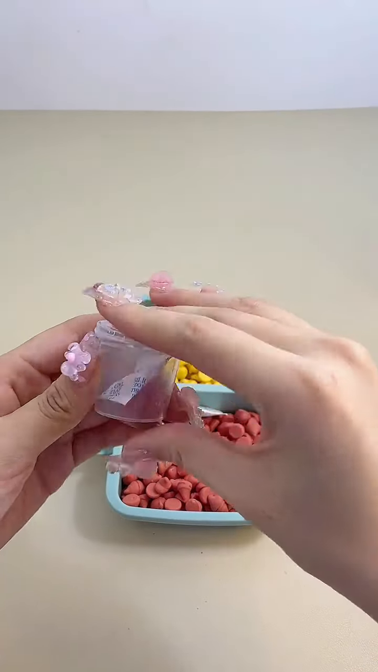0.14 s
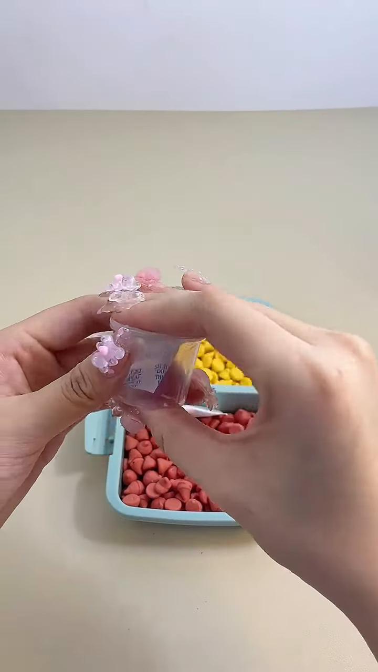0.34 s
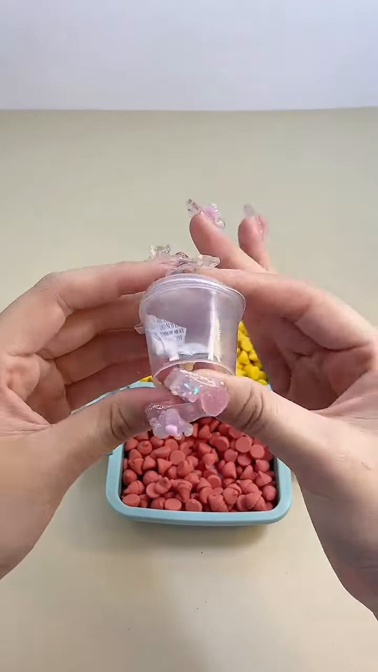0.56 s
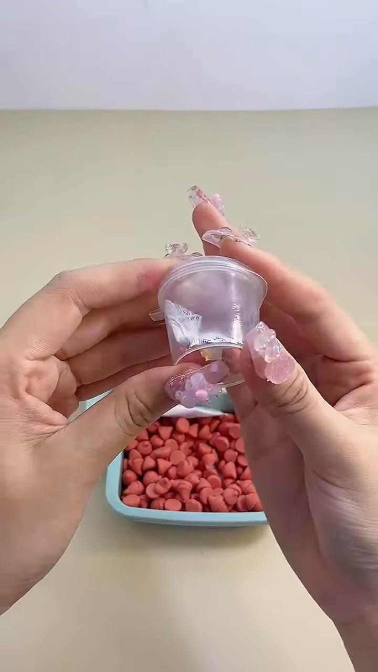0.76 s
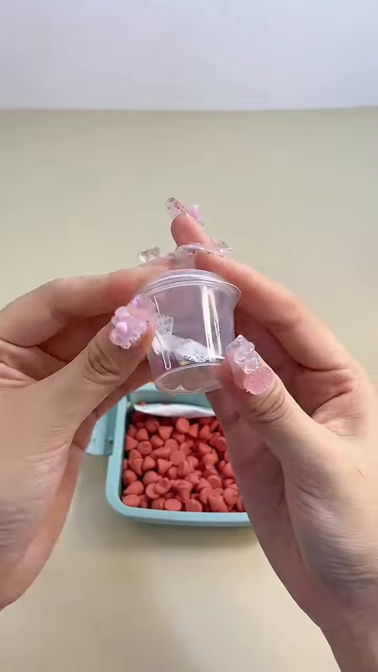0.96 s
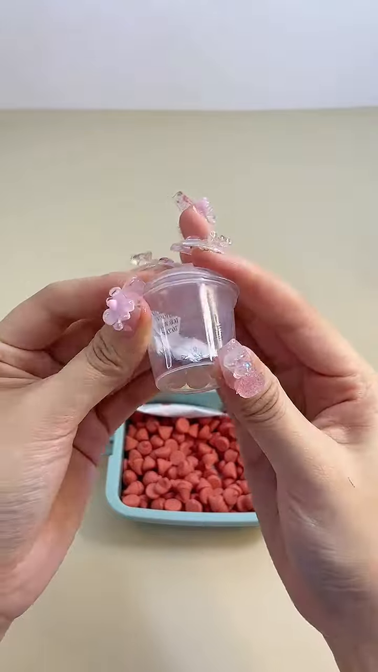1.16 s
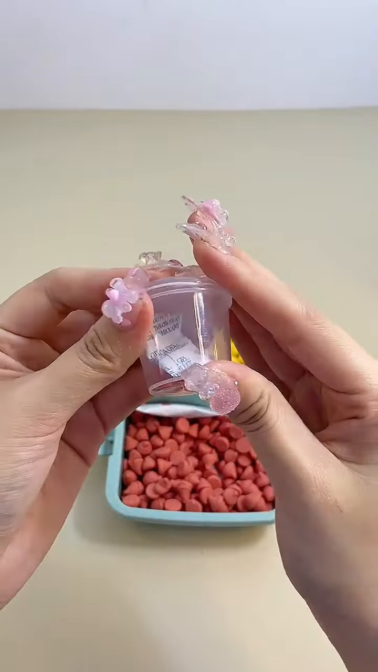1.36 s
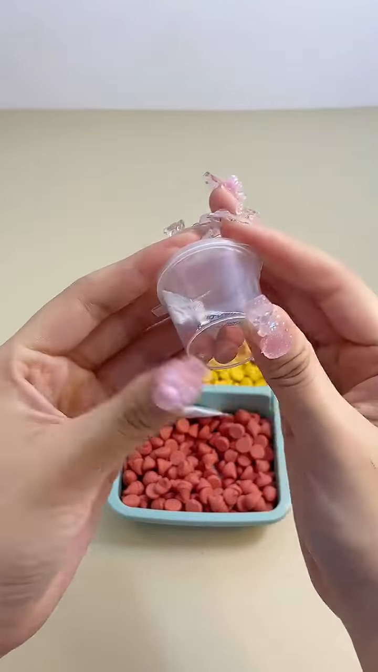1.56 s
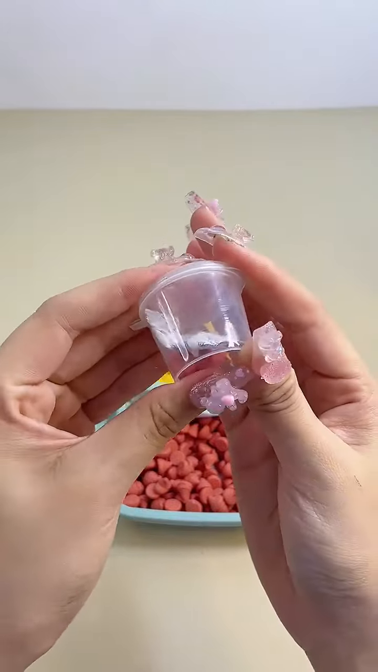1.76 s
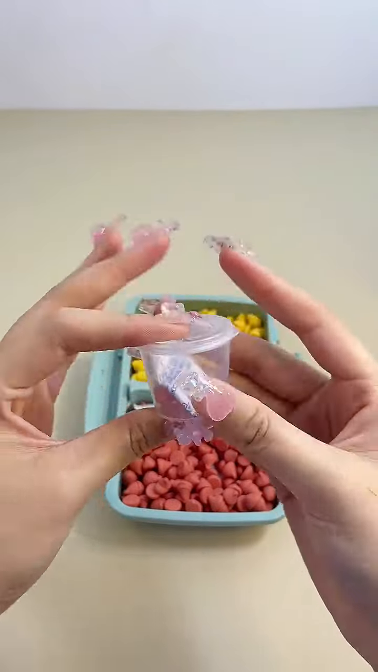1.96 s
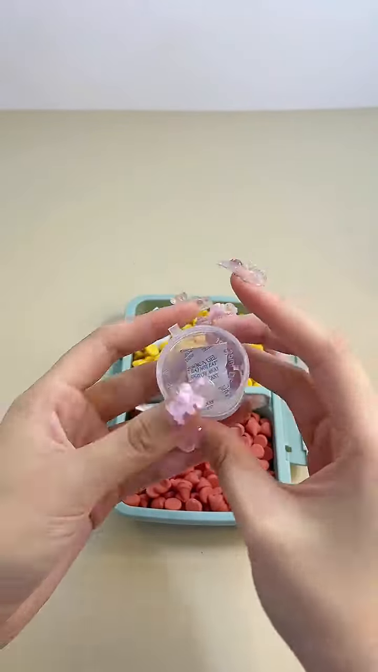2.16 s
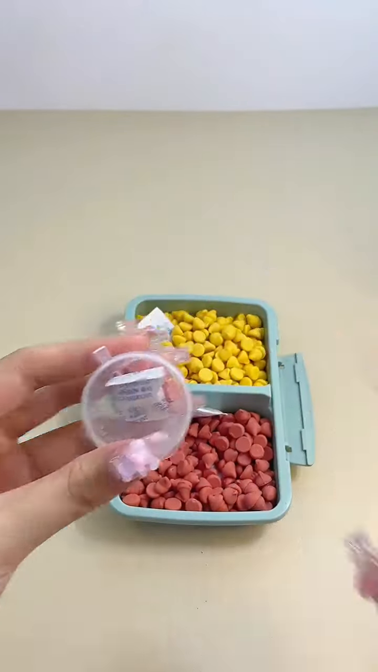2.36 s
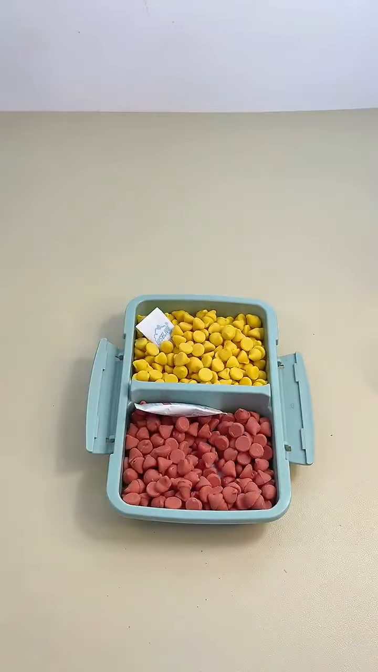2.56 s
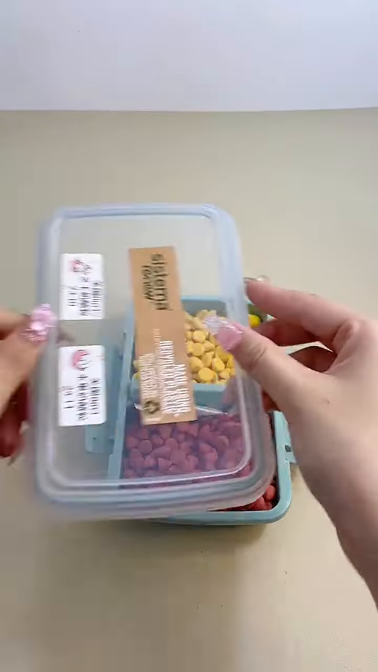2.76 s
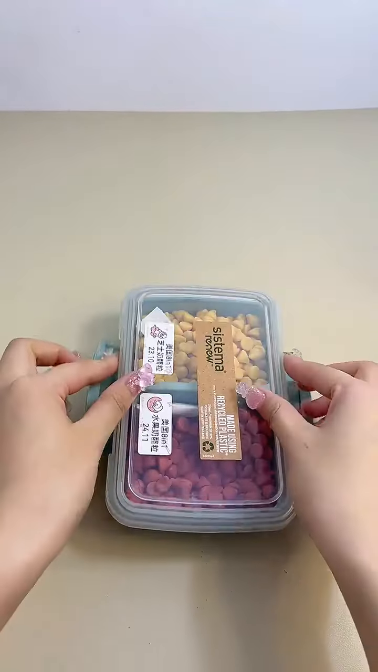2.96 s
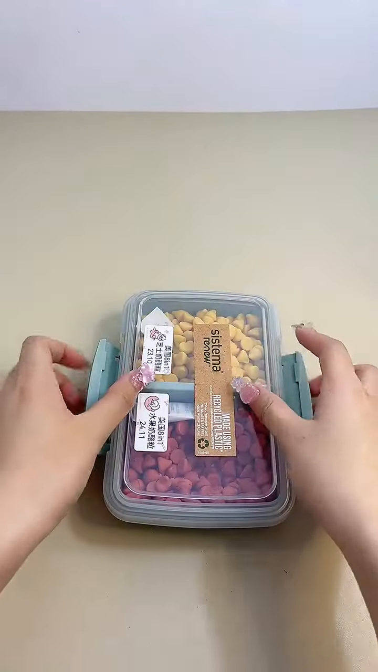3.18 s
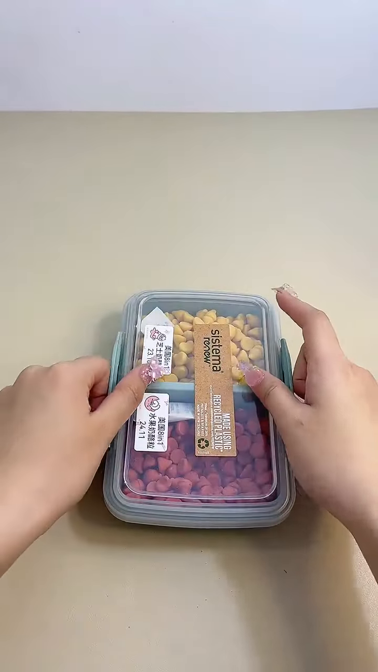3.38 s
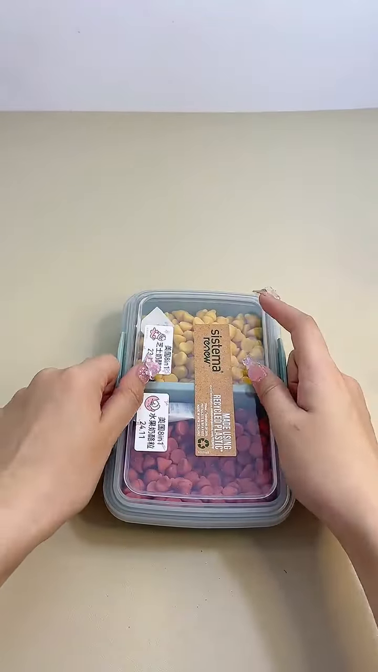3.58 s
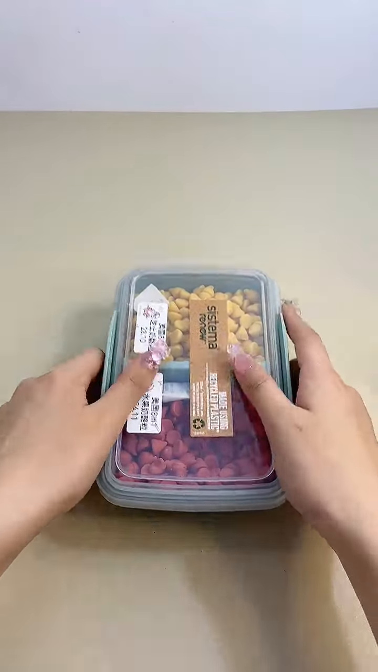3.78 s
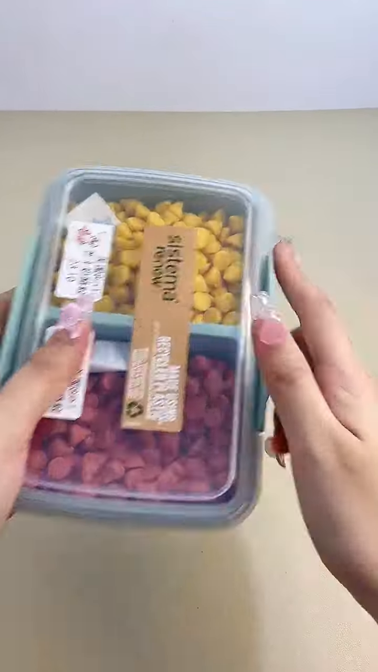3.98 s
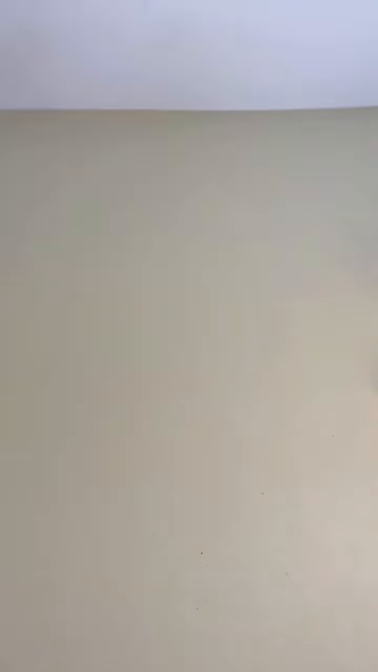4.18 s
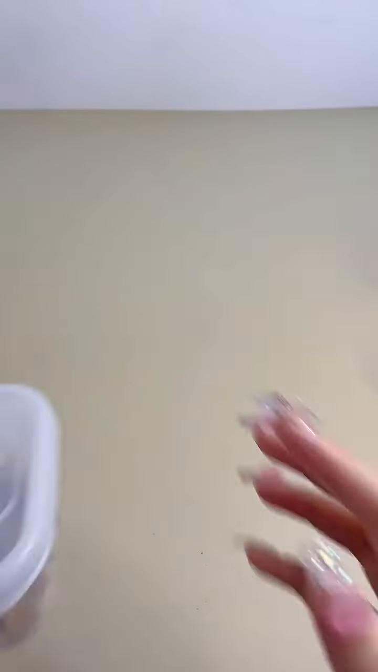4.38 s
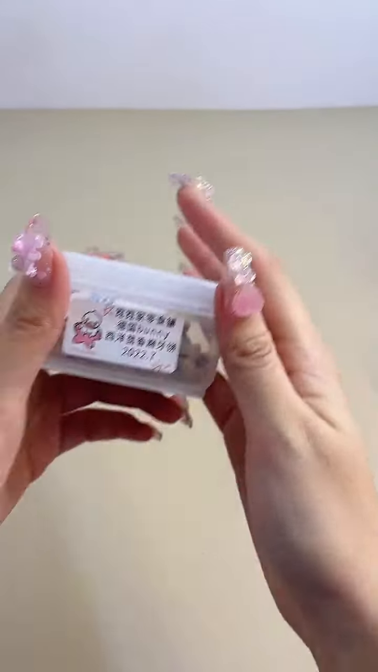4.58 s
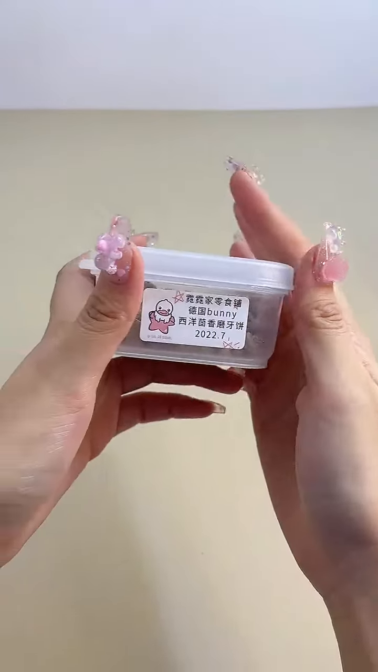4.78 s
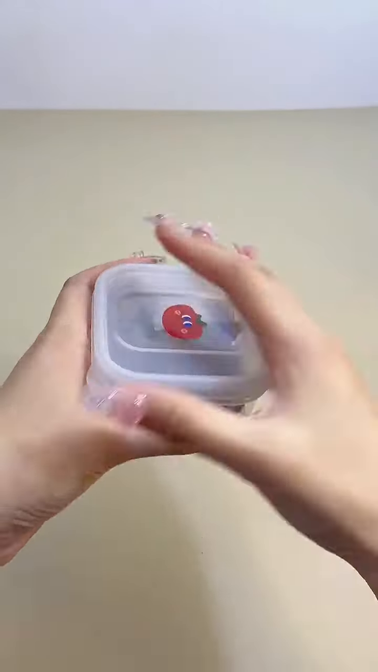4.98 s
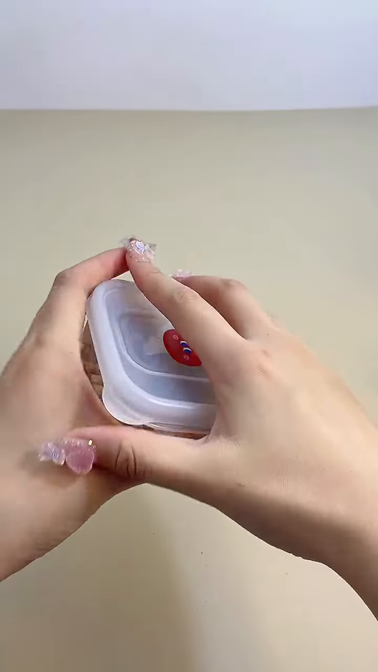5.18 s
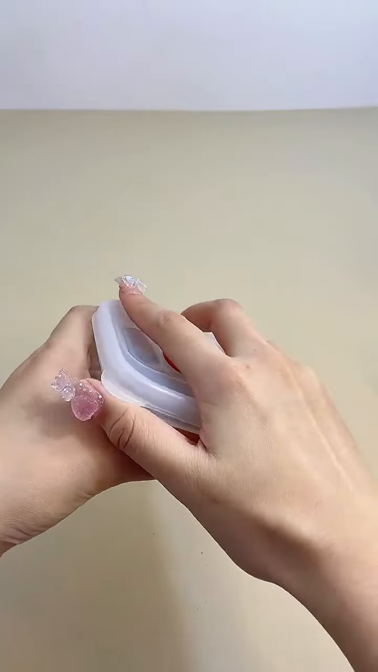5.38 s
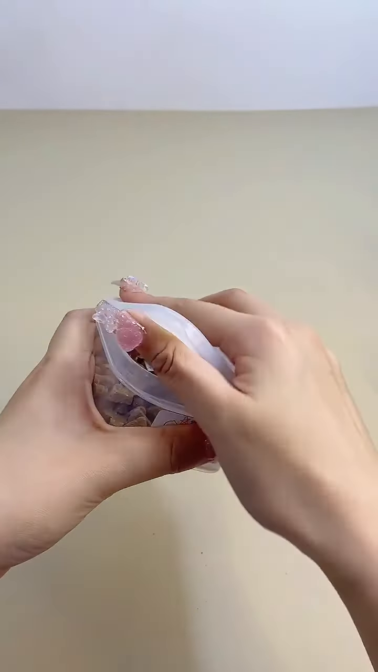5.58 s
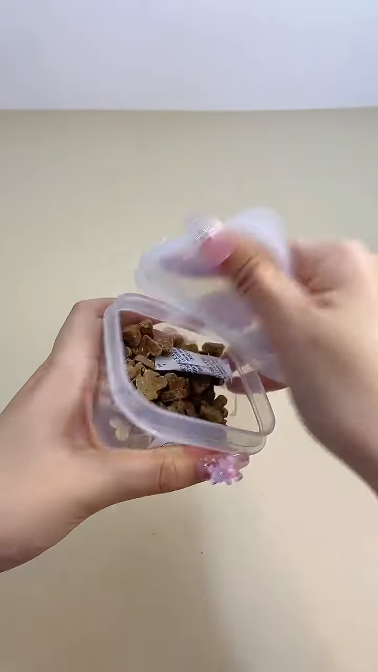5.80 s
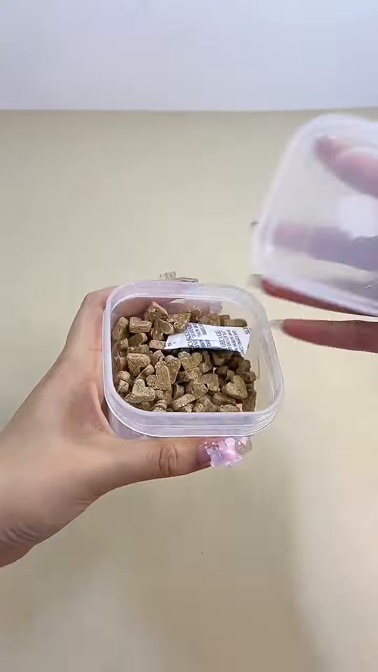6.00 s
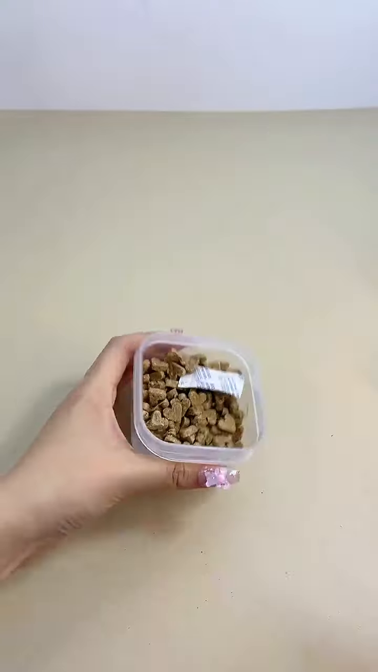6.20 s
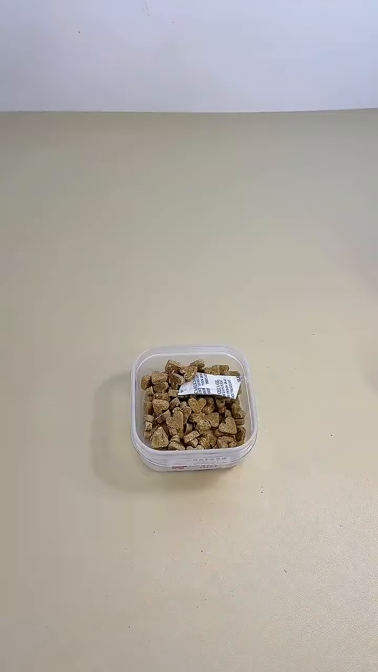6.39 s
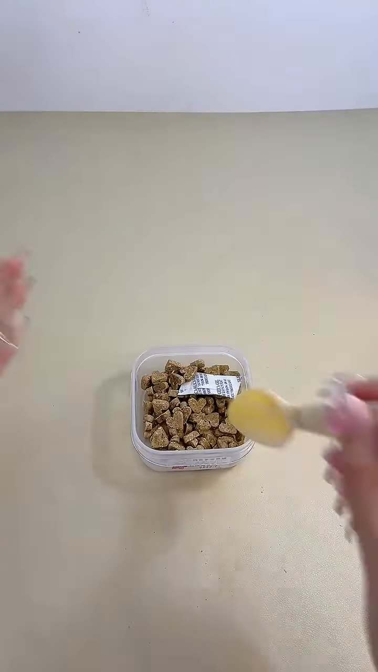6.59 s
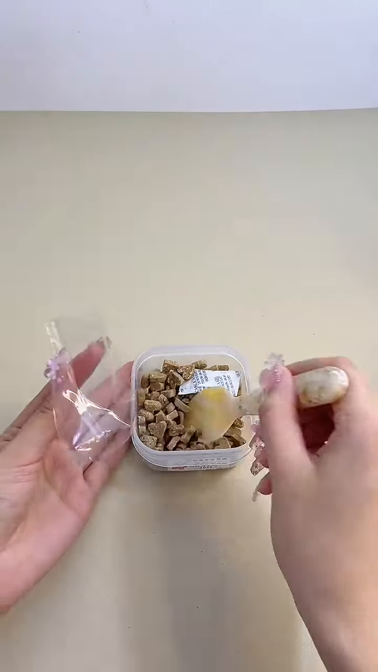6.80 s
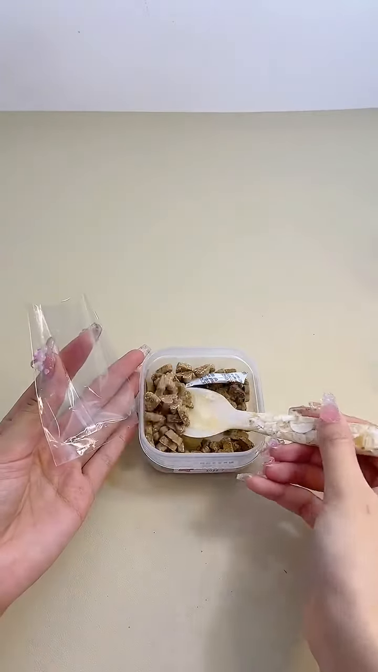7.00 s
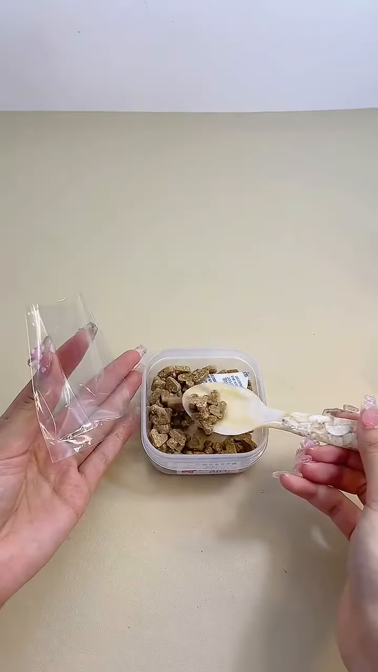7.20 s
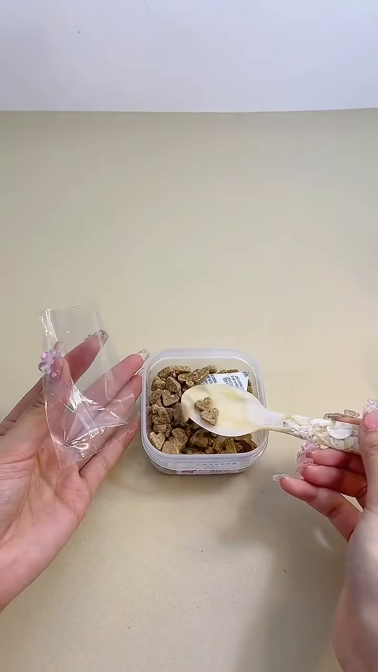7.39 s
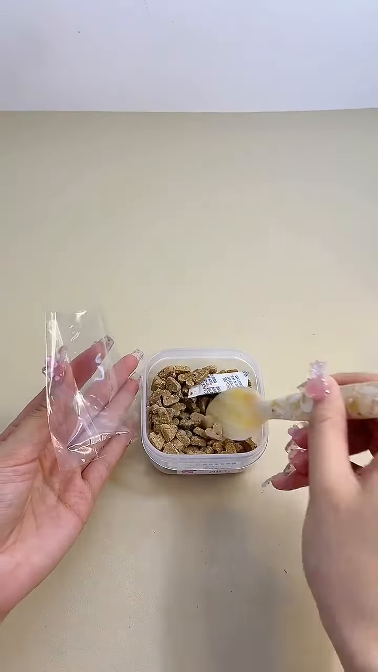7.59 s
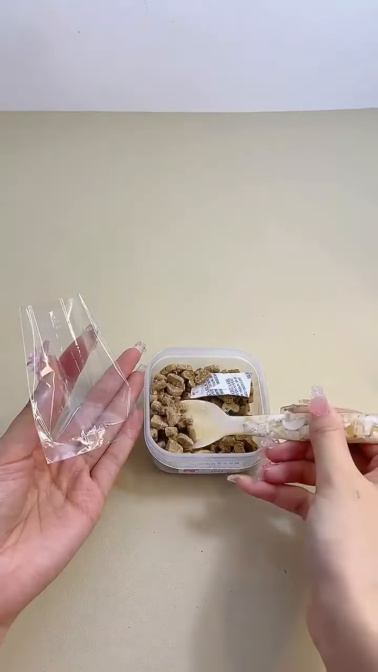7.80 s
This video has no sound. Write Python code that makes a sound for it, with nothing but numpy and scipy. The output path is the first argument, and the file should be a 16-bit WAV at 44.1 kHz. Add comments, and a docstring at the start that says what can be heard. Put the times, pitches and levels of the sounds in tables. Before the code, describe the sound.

Hard nails tap and click on thin plastic tubs, lids snap shut, then dry pellets rattle and crunch under a digging spoon, close up.

```python
"""Hands with long hard nails turn a small plastic cup, lay a lid on a lunch box and snap its catches shut.
Each touch is a short noise push that makes a plastic wall ring and crack; sliding is a run of tiny pushes.
A tub of dry pellets is tilted, loses its lid and is dug into with a spoon: many small clicks and pitched ticks.
A bag crinkles in sharp ticks and boxes bump dully, heard close up in stereo.
A small quiet room adds short reflections, faint hiss and a low rumble."""
import sys
import numpy as np
from scipy import signal
from scipy.fft import rfft, irfft
from scipy.io import wavfile

SR = 44100
rng = np.random.default_rng(int(sys.argv[2]) if len(sys.argv) > 2 else 0)


def waveform_to_disk(signal):
    """Save audio, clipped to [-1, 1], as 16-bit WAV at the path in sys.argv[1]."""
    frames = np.transpose(np.atleast_2d(signal))
    scaled = np.clip(frames, -1, 1) * 32767
    samples = np.round(scaled).astype(np.int16)
    wavfile.write(sys.argv[1], SR, samples)


N = 346185
TIME = np.arange(N) / SR   # the moment of every sample, in seconds


# nails, rims and spoon knocking on plastic, levels relative:
# (time [s], wall level [dB], wall pitch [Hz], crack level [dB])
KNOCKS = [(0.025, -20, 1145, -16), (0.164, -9.5, 1150, -54), (0.2167, -9, 1120, -41),
          (0.258, -14.5, 895, -15.5), (0.473, -17, 1810, -26), (0.7019, -20, 1680, -19),
          (0.738, -15.5, 2160, -19), (0.7567, -16.5, 2100, -19), (0.9387, -17, 2140, -19.5),
          (1.0773, -24, 1000, -25), (1.2757, -23.5, 1120, -15.5), (1.349, -20, 2040, -30),
          (1.565, -35, 2000, -28), (1.586, -28.5, 2180, -19), (1.7116, -27, 1170, -27),
          (1.784, -32, 630, -44), (1.947, -14, 1430, -22), (1.979, -17, 1270, -28),
          (2.676, -18.5, 1430, -29), (2.857, -23.5, 1280, -44), (2.8972, -15.5, 1660, -28),
          (3.006, -15.5, 1080, -19.5), (3.028, -9.5, 793, -33), (3.0658, -12, 624, -26),
          (3.31, -21, 1150, -24), (3.342, -26, 1090, -39), (3.439, -13, 498, -21.5),
          (3.5354, -10, 1730, -25), (3.715, -19.5, 660, -25), (3.7624, -18.5, 1120, -23.5),
          (3.988, -24, 535, -54), (4.185, -24.5, 1880, -29.5), (4.3933, -28, 360, -27.5),
          (4.5274, -13, 1880, -23), (4.562, -20.5, 3000, -21), (4.654, -13, 2540, -15),
          (5.145, -19.5, 2460, -13.5), (5.257, -40, 1980, -37.5), (5.3342, -24, 1700, -23.5),
          (5.417, -37, 1670, -29), (5.644, -21, 704, -18.5), (5.845, -5, 893, -18),
          (5.9378, -21, 1340, -50), (6.033, -8.5, 1200, -15), (6.169, -24, 2160, -29),
          (6.206, -31.5, 1320, -34), (6.253, -26.5, 3030, -34), (6.298, -15.5, 1430, -35),
          (6.3923, -21, 2400, -19), (6.7358, -10.5, 1360, -18), (6.8492, -24, 2350, -26.5),
          (7.061, -37, 1980, -27), (7.2115, -16.5, 1360, -24), (7.254, -21, 2040, -34),
          (7.3315, -20, 1370, -32), (7.367, -12, 1660, -25), (7.3783, -22, 1670, -28),
          (7.419, -20, 1960, -25), (7.4655, -11.5, 1860, -26), (7.6004, -15.5, 1900, -45),
          (7.653, -10, 2210, -29), (7.696, -21, 1650, -29)]


def taps(colours, swell_db=-18, swell_contacts=5.7, tail_db=-19, tail_contacts=5, blow_db=13):
    """A soft noise swell, a hard noisy blow and a faint fading tail; high-pitched spots get shorter contacts."""
    out = np.zeros((2, N))
    t = TIME[TIME < .1] - .02   # the blow lands at zero, after 20 ms of soft swell
    blow = from_db(blow_db) * (abs(t) == abs(t).min())
    for start, wall_db, hz, crack_db in KNOCKS:
        contact_s = min(2.4 / hz, .003)
        age = abs(t) / contact_s   # counted in contact lengths
        swell = from_db(swell_db) * np.exp(-age / swell_contacts)
        tail = from_db(tail_db) * np.exp(-age / tail_contacts)
        force = np.where(t < 0, swell, np.exp(-age) + tail)
        push = force * rng.standard_normal((2, len(t)))
        knock = plastic(push, hz, 0.0046, wall_db, crack_db, ring_db=4.5, damping=.16,
                        colours=colours, blow=blow)
        add(out, start + t[0], knock)
    return out


# tone colour of the plastic wall: (frequency [Hz], relative level [dB])
WALL_COLOUR = [(60, -21.5), (300, -11), (700, -9), (1400, 5), (2500, 0), (3600, -6), (8000, -47)]
# tone colour of the bright crack: (frequency [Hz], relative level [dB])
CRACK_COLOUR = [(1800, -16), (2900, 15.5), (5500, 6.5), (7500, -6.5), (9500, -5), (12800, -4.5),
                (14500, -49)]


def plastic_colours():
    """The wall and the crack each favour some frequencies, which a filter imitates."""
    return response(WALL_COLOUR), response(CRACK_COLOUR)


def plastic(push, hz, seconds, wall_db, crack_db, ring_db, damping, colours, blow=0,
            overtone_db=-0.5, overtone_width_hz=110, edge_hz=11000, db_per_octave=16):
    """A thin wall answers a push with one damped ring, a broad body tone and a bright crack."""
    wall, crack = colours
    near = stereo(push, 0.57)   # long waves reach both sides partly alike
    ring = lasting(resonate(near + blow, hz, hz * damping), seconds)
    body = lasting(through(near + blow, wall), seconds)
    low = lasting(from_db(ring_db) * ring + body, seconds)

    # every point of contact wakes its own handful of high rings, heard in step or out of step
    overtones = 0
    for pitch in rng.uniform(5000, 12500, 12):
        spot = stereo(push, rng.uniform(-1.5, 1))
        overtones = overtones + resonate(spot, pitch, overtone_width_hz)
    scatter = rms_one(stereo(push, 0))
    high = through(scatter + from_db(overtone_db) * rms_one(overtones), crack)

    # a hard contact, with much crack for its wall tone, also reaches higher than a soft one
    edge = edge_hz * 2 ** ((crack_db - wall_db) / db_per_octave)
    edge = np.clip(edge, SR / 9, SR / 2.3)
    low_pass = signal.butter(2, edge, fs=SR, output="sos")
    high = lasting(signal.sosfilt(low_pass, high), seconds)
    return from_db(wall_db) * low + from_db(crack_db) * high


def wall_hz(s):
    """The grip tunes the wall, so a slide rings at the pitch of the knock nearest to it in time."""
    return min(KNOCKS, key=lambda knock: abs(knock[0] - s))[2]


def slides(rows, colours, rise_s, fall_s, per_s, spread_db, ring_db, damping):
    """Plastic sticks and slips: a run of tiny contacts that swells, holds and dies away."""
    out = np.zeros((2, N))
    for start, length, wall_db, crack_db in rows:
        begin = max(0, start - .025)   # leave room for the swell
        hz = wall_hz(start + length / 2)
        t = TIME[TIME < .25] + begin - start
        pressure = np.exp(np.minimum(t, 0) / rise_s - np.maximum(t - length, 0) / fall_s)
        push = pressure * grains(len(t), per_s, spread_db, grain_s=0.0057)
        seconds = length + (rise_s + fall_s) / 2
        add(out, begin, plastic(push, hz, seconds, wall_db, crack_db, ring_db, damping, colours))
    return out


# fingers and lids sliding over plastic, levels relative:
# (time [s], length [s], wall level [dB], scratch level [dB])
RUBBINGS = [(0.002, 0.028, -12.5, -19.5), (0.155, 0.028, -31.5, -31.5), (0.205, 0.04, -23.5, -32),
            (0.612, 0.035, -39.5, -36.5), (0.665, 0.052, -30, -28), (0.903, 0.093, -39, -36),
            (1.228, 0.018, -65, -30.5), (1.278, 0.027, -18.5, -23), (1.562, 0.024, -33.5, -27),
            (1.93, 0.059, -42, -36.5), (2.03, 0.044, -30.5, -31.5), (2.168, 0.038, -38, -41.5),
            (2.247, 0.017, -24, -30.5), (2.48, 0.05, -68, -51), (2.602, 0.01, -40.5, -39),
            (2.665, 0.21, -33.5, -44), (2.716, 0.033, -18.5, -24.5), (2.95, 0.028, -21, -31.5),
            (3.005, 0.073, -23.5, -33.5), (3.085, 0.074, -39.5, -44.5), (3.34, 0.026, -20, -30),
            (3.425, 0.008, -38, -35.5), (3.678, 0.092, -35.5, -35), (3.701, 0.01, -22, -32.5),
            (3.902, 0.035, -36.5, -34.5), (3.984, 0.018, -32, -32), (4.658, 0.024, -26, -17.5),
            (4.82, 0.0066, -28, -24.5), (5.325, 0.12, -41, -42.5), (5.635, 0.076, -32, -32.5),
            (5.865, 0.094, -30, -41.5), (6.602, 0.016, -32, -25.5), (6.675, 0.012, -54, -39.5)]


def rubs(colours):
    """A sliding finger or lid catches and lets go in a loose run of tiny contacts."""
    return slides(RUBBINGS, colours, rise_s=0.0041, fall_s=0.011, per_s=730, spread_db=3.5,
                  ring_db=0.5, damping=0.22)


# a lid or catch forced over its bead, levels relative:
# (time [s], length [s], wall level [dB], crack level [dB])
CLOSINGS = [(0.457, 0.018, -33, -15), (1.437, 0.031, -15.5, -13.5), (3.535, 0.033, -14, -12.5),
            (5.548, 0.023, -17.5, -16), (5.842, 0.024, -18.5, -24), (6.019, 0.017, -13.5, -17.5)]
# tone colour of a sharp snap, shared with the bag: (frequency [Hz], relative level [dB])
SNAP_COLOUR = [(1100, -16.5), (2300, 13), (7000, -2), (12800, -12.5), (14500, -53)]


def snaps():
    """A lid or catch forced over its bead is a short, very dense run of contacts with a sharp crack."""
    colours = response(WALL_COLOUR), response(SNAP_COLOUR)
    return slides(CLOSINGS, colours, rise_s=0.0047, fall_s=0.0026, per_s=9600, spread_db=4.5,
                  ring_db=-1, damping=0.18)


# high rings of the tub under a skidding nail: (frequency [Hz], width [Hz], relative level [dB])
NAIL_RINGS = [(5370, 330, -20.5), (9000, 230, -28.5)]
SKID_S, SKID_FADE_DB_PER_S = 4.656, 171


def skid():
    """Fast slips of a nail down the tub, made of noise, ring its high pitches and fade away."""
    slips = rng.standard_normal((2, N))
    rings = sum(from_db(db) * rms_one(resonate(slips, hz, width)) for hz, width, db in NAIL_RINGS)
    fade = from_db(-SKID_FADE_DB_PER_S * abs(TIME - SKID_S))
    return (TIME > SKID_S) * fade * rings


# dragged plastic groaning at a gliding pitch:
# (time [s], length [s], first pitch [Hz], last pitch [Hz], relative level [dB])
DRAGS = [(2.028, 0.063, 1497, 1347, -27), (3.023, 0.13, 900, 482, -28), (5.799, 0.08, 754, 995, -33)]


def groans(width_hz=140):
    """Friction is slow noise that shakes the strength of one tone, gliding as the plastic bends."""
    out = np.zeros((2, N))
    low_pass = signal.butter(2, width_hz, fs=SR, output="sos")
    for start, length, first_hz, last_hz, db in DRAGS:
        t = TIME[TIME < length]
        phase = 2 * np.pi * np.cumsum(np.geomspace(first_hz, last_hz, len(t))) / SR
        grip = signal.sosfilt(low_pass, stereo(rng.standard_normal((2, len(t))), 0.41))
        swell = np.sin(np.pi * t / length)
        add(out, start, from_db(db) * rms_one(grip * swell * np.sin(phase)))
    return out


# tone colour of the pellets under the lid: (frequency [Hz], relative level [dB])
SHUT_COLOUR = [(88, -24), (150, -9), (574, -12.5), (2610, 0.5), (5450, -13.5), (7810, -27.5), (9260, -25.5),
               (13800, -45)]
# tone colour of the pellets in the open: (frequency [Hz], relative level [dB])
OPEN_COLOUR = [(88, -59.5), (150, -6), (255, -34), (620, -24.5), (2040, -1.5), (3330, -10.5), (6340, -16),
               (7810, -32.5), (8910, -24.5), (13800, -47.5)]
# rings of the open pellet tub: (frequency [Hz], width [Hz], relative level [dB])
TUB_RINGS = [(2933, 7.3, -14.5), (4020, 21, -16.5)]
LID_OFF_S = 5.7


def pellets(per_s=110, width_share=0.25, patchy_db=3.0, clump_db=2.0):
    """Dry pellets collide with each other and the tub, first under the lid and then in the open."""
    # hard collisions are broad clicks; lighter ones each tick at a pitch of their own
    hits = from_db(-6.0) * rms_one(stereo(grains(N, per_s=300, spread_db=3.5, grain_s=0.0014), 0.94))
    for hz in np.geomspace(500, 12500, num=12):
        alike = 0.43 * (hz < 2400)   # the high ticks are unrelated between left and right
        ticks = stereo(grains(N, per_s, spread_db=1.5, grain_s=0.01), alike)
        ticks = rms_one(ticks * from_db(patchy_db * drift(30)))
        width = hz * width_share
        hits = hits + np.pi * width / SR * resonate(ticks, hz, width)
    hits = hits * from_db(clump_db * drift(140))   # pellets fall in clumps

    shut = rms_one(through(hits, response(SHUT_COLOUR)))
    opened = rms_one(through(hits, response(OPEN_COLOUR)))
    tub = sum(from_db(db) * rms_one(resonate(hits, hz, width)) for hz, width, db in TUB_RINGS)
    crunch = np.where(TIME < LID_OFF_S, shut, rms_one(opened + tub))   # the lid mutes the tub
    return from_db(-0.5) * tumble() * crunch


# a tilt, a jolt or a push of the spoon moves the pellets: (time [s], length [s], relative level [dB])
PUSHES = [(4.464, 0.3, -21), (4.518, 0.006, -29), (4.813, 0.014, -21), (4.921, 0.0072, -28),
          (4.966, 0.021, -26.5), (5.007, 0.068, -34), (5.117, 0.0083, -19.5), (6.284, 0.04, -20),
          (6.732, 0.22, -21.5), (6.775, 0.034, -11), (6.997, 0.12, -24), (7.129, 0.16, -20),
          (7.175, 0.011, -19), (7.383, 0.033, -15.5), (7.431, 0.097, -25), (7.618, 0.0037, -8.5),
          (7.679, 0.041, -11), (7.735, 0.15, -25.5), (7.818, 0.0054, -15)]
# the heap gives way quickly, weakens and stops; a few pellets go on settling
GIVE_S, SAG_DB_PER_S, STOP_S, SETTLE_S, SETTLE_DB = 0.0087, 12, 0.014, 0.012, -21


def tumble():
    """How hard the pellets move: each shove swells, sags and stops, then the heap settles."""
    power = np.zeros(N)
    for start, length, db in PUSHES:
        before = np.maximum(start - TIME, 0)
        during = np.clip(TIME - start, 0, length)
        after = np.maximum(TIME - start - length, 0)
        settling = from_db(SETTLE_DB) * np.exp(-after / SETTLE_S)
        release = np.maximum(np.exp(-after / STOP_S), settling)
        power += (from_db(db - SAG_DB_PER_S * during) * np.exp(-before / GIVE_S) * release) ** 2
    return np.sqrt(power)


# a thin bag crinkling in the other hand: (time [s], length [s], relative level [dB])
BAG_MOVES = [(7.009, 0.0075, -26.5), (7.216, 0.006, -14), (7.428, 0.0058, -26), (7.831, 0.0031, -11)]


def bag(edge_s=0.0032):
    """Creases in the film flip over in short runs of sharp ticks."""
    flex = 0
    for start, length, db in BAG_MOVES:
        outside = np.maximum(abs(TIME - start - length / 2) - length / 2, 0)
        flex = flex + from_db(db) * np.exp(-outside / edge_s)
    ticks = grains(N, per_s=1500, spread_db=0.5, grain_s=0.00041)
    return flex * rms_one(through(ticks, response(SNAP_COLOUR)))


# dull bumps of a box against hand or table: (time [s], relative level [dB], pitch [Hz])
BOX_BUMPS = [(1.435, -16.5, 330), (2.673, -23, 150), (2.734, -21.5, 460), (3.033, -22, 148),
             (3.124, -32, 147), (3.536, -19.5, 346), (4.019, -36, 182), (4.516, -26, 343), (5.55, -22, 210),
             (5.843, -24, 212), (6.288, -24, 114), (6.774, -29, 133), (7.686, -31, 129)]


def bumps(decay_s=0.021, rise_s=0.00032, damping=0.71):
    """A soft push sets the whole box and the table top thudding."""
    out, t = np.zeros((2, N)), TIME[TIME < .15]
    shape = (1 - np.exp(-t / rise_s)) * np.exp(-t / decay_s)
    soft = signal.butter(2, 480, fs=SR, output="sos")
    for start, db, hz in BOX_BUMPS:
        noise = stereo(rng.standard_normal((2, len(t))), 0.83)
        push = signal.sosfilt(soft, shape * noise)
        thud = lasting(resonate(push, hz, hz * damping), 0.072)
        add(out, start, from_db(db - 8.0) * thud)
    return out


def skin(colours):
    """Fingertips keep shifting faintly on the plastic, at random moments."""
    wall, crack = colours
    shifts = stereo(grains(N, per_s=9.3, spread_db=12.0, grain_s=0.084), 0.14)
    return rms_one(through(shifts, wall + crack / 2))


def room(x, t60=0.26, delay_s=0.0015):
    """Dense reflections from table and walls, different on each side, fall by 60 dB in t60 seconds."""
    t = TIME[TIME < .5]
    tail = rng.standard_normal((2, len(t))) * from_db(-60 * t / t60) * (t > delay_s)
    tail = signal.sosfilt(signal.butter(1, 600, "high", fs=SR, output="sos"), tail)
    return through(x, lasting(tail, 1 / SR))


# tone colour of the room hiss: (frequency [Hz], relative level [dB])
AIR_COLOUR = [(25, -29.5), (125, -3.5), (370, -12), (4500, -25.5), (13800, -38)]


def air():
    """Faint room hiss of filtered noise and a low rumble that swells and sinks."""
    hiss = rms_one(through(stereo(rng.standard_normal((2, N)), 0.17), response(AIR_COLOUR)))
    swells = stereo(grains(N, per_s=20, spread_db=-3.5, grain_s=0.034), 1.0)
    band = signal.butter(2, [28, 130], "band", fs=SR, output="sos")
    rumble = rms_one(signal.sosfilt(band, swells))
    return from_db(-51.5) * hiss + from_db(-52) * rumble


def from_db(db):
    """Turn decibels into a plain multiplier."""
    return 10 ** (np.asarray(db) / 20)


def rms_one(x):
    """Scale a sound to an average power of one."""
    return x / np.sqrt(np.mean(x ** 2) + 1e-20)


def lasting(x, seconds):
    """Give a burst the energy of a unit-power sound of this length."""
    return rms_one(x) * np.sqrt(seconds * SR / x.shape[-1])


def add(out, start, x):
    """Mix a stereo burst in at its start time."""
    i = max(0, int(start * SR))
    out[:, i:i + x.shape[1]] += x[:, :N - i]


def response(points, size=4096):
    """Turn a tone colour into a filter that reacts as early as it can (minimum phase)."""
    hz, db = np.transpose(points)
    bins = np.maximum(np.fft.rfftfreq(size, 1 / SR), 1)
    level_db = np.interp(np.log(bins), np.log(hz), db)
    cepstrum = irfft(np.log(from_db(level_db)))
    # fold the second half onto the first, so that nothing sounds before the push
    cepstrum[1:size // 2] *= 2
    cepstrum[size // 2 + 1:] = 0
    return irfft(np.exp(rfft(cepstrum)))[None, :size // 2]


def through(x, impulse):
    """Send both channels through a filter, keeping the length."""
    return signal.fftconvolve(x, impulse, axes=1)[:, :x.shape[1]]


def resonate(x, hz, width):
    """One damped ring: the wider its band in Hz, the faster it dies."""
    r = np.exp(-np.pi * width / SR)
    return signal.lfilter([1, 0, -1], [1, -2 * r * np.cos(2 * np.pi * hz / SR), r * r], x + 1e-18)


def stereo(pair, alike):
    """Two unrelated signals become left and right with the given likeness, from -1 to 1."""
    alike = np.clip(alike, -1, 1)
    middle = np.sqrt((1 + alike) / 2) * pair[0]
    side = np.sqrt((1 - alike) / 2) * pair[1]
    return middle + side * [[1], [-1]]


def grains(n, per_s, spread_db, grain_s):
    """Tiny contacts at random moments, of uneven force, each a short spray of noise."""
    strength_db = spread_db * np.minimum(rng.exponential(1, n), 3.5)
    force = (rng.random(n) < per_s / SR) * from_db(strength_db)
    power = signal.lfilter([1], [1, -np.exp(-2 / (grain_s * SR))], force ** 2 + 1e-9)
    return np.sqrt(power) * rng.standard_normal((2, n))


def drift(per_s):
    """Random wander in straight lines between per_s new values a second."""
    return np.interp(TIME * per_s, np.arange(N), rng.standard_normal(N))


def scene():
    """Handling sounds close by, their reflections and the still air of the room."""
    colours = plastic_colours()
    knocks = from_db(0.21) * taps(colours)
    rubbing = from_db(0.46) * rubs(colours) + skid() + groans()
    snapping = from_db(-0.4) * snaps()
    food = pellets() + bag()
    reflections = room(from_db(-17.5) * (knocks + rubbing + food) + from_db(-11.0) * snapping)
    close = knocks + rubbing + snapping + food + bumps()
    return close + reflections + from_db(-60.5) * skin(colours) + air()


def record(dry):
    """The loudest peaks are rounded and everything above 14.6 kHz is cut."""
    rounded = 1.186 * np.tanh(dry / 1.018)
    return signal.sosfilt(signal.cheby2(16, 60, 14600, fs=SR, output="sos"), rounded)


dry = scene()
out = record(dry)
waveform_to_disk(out)
```